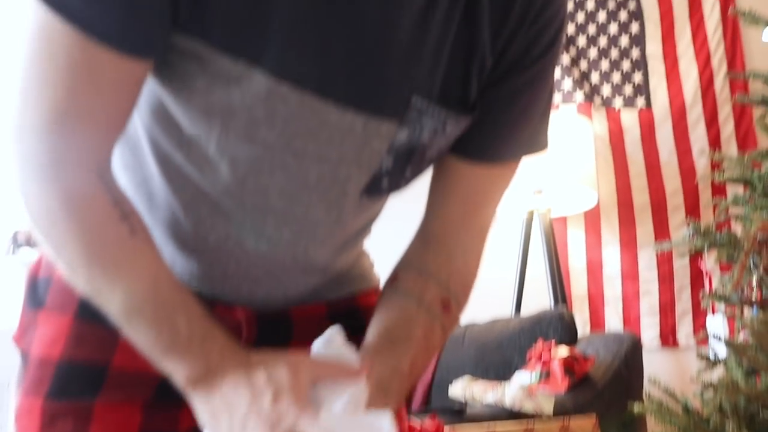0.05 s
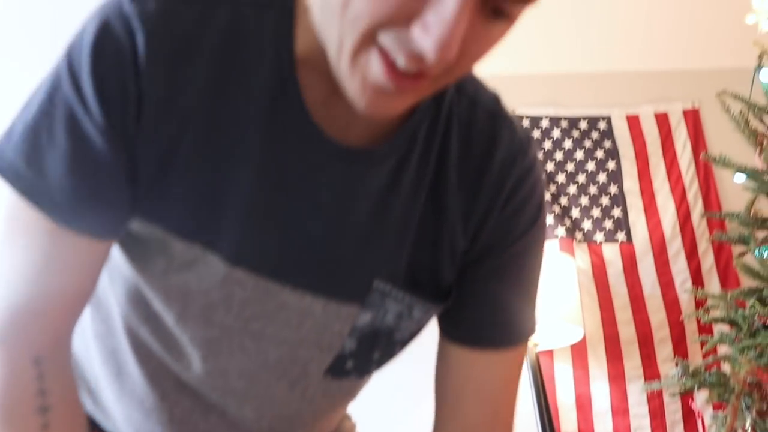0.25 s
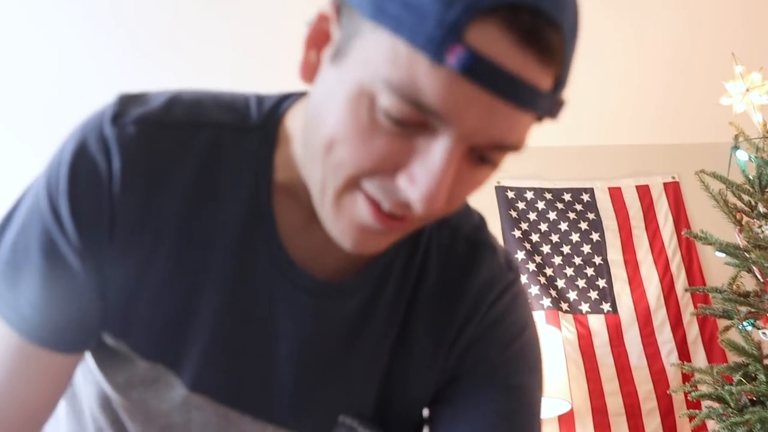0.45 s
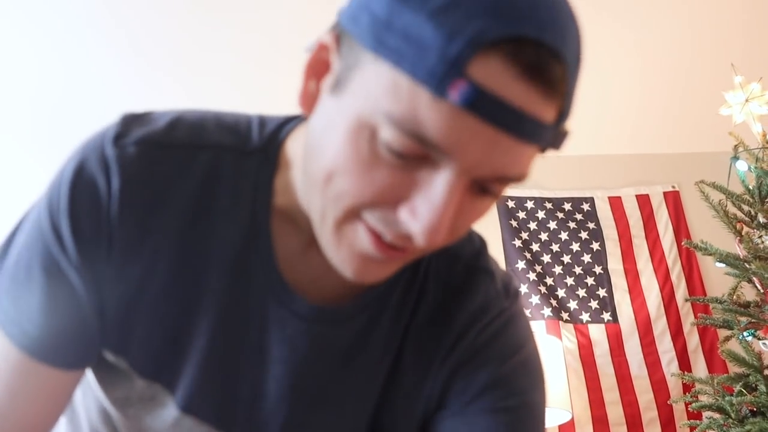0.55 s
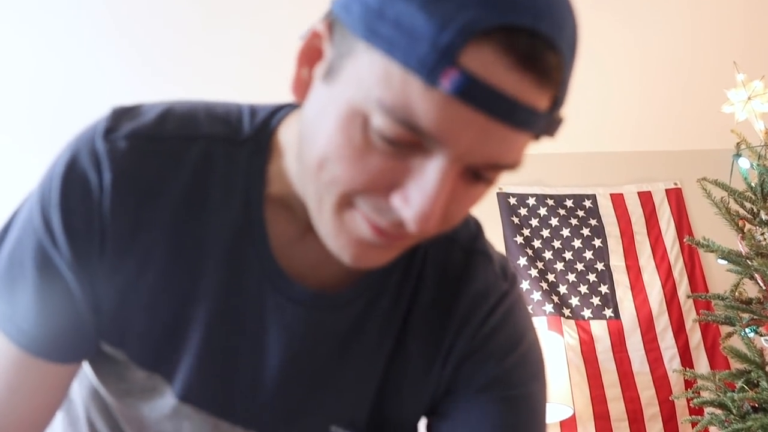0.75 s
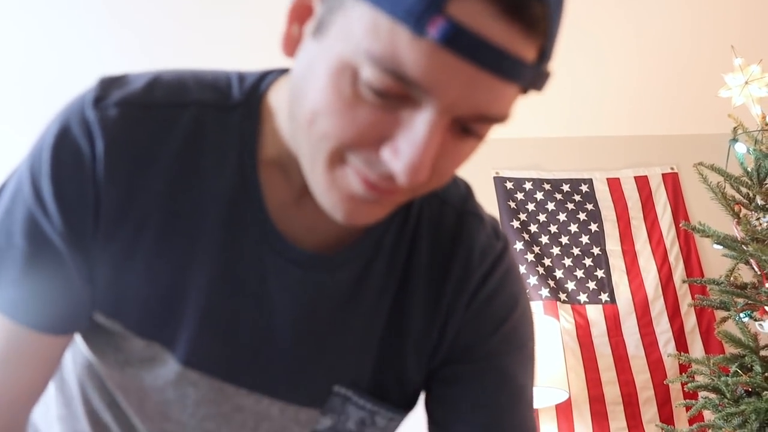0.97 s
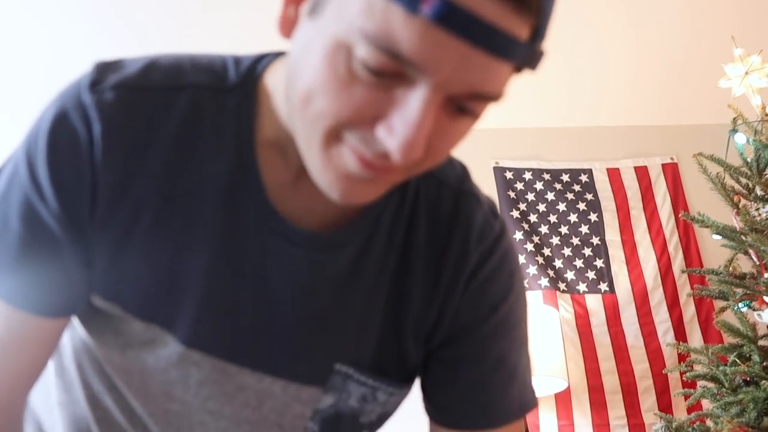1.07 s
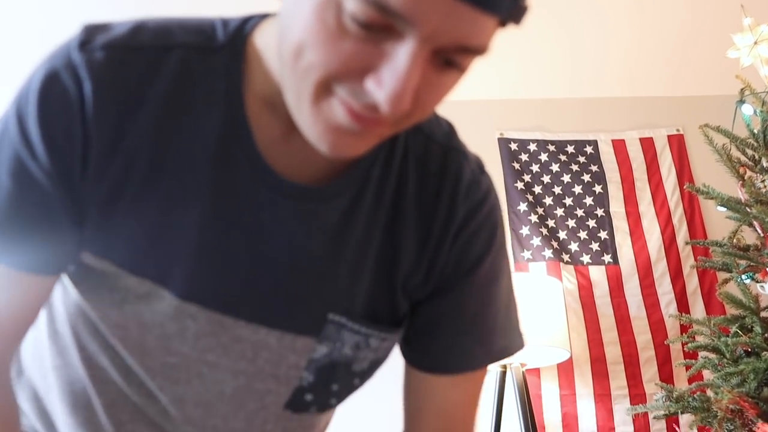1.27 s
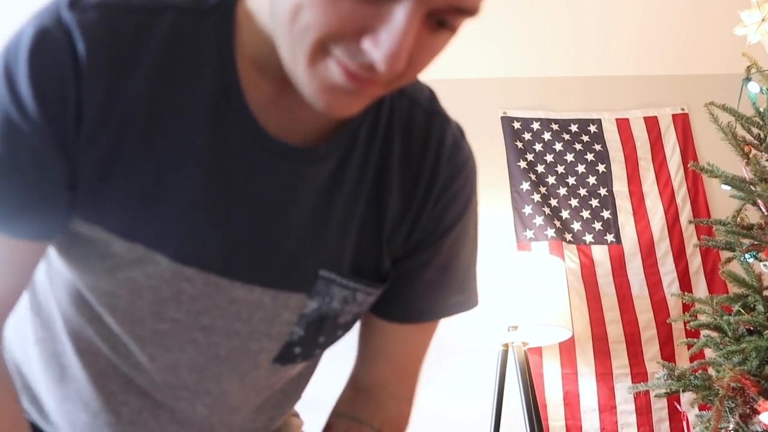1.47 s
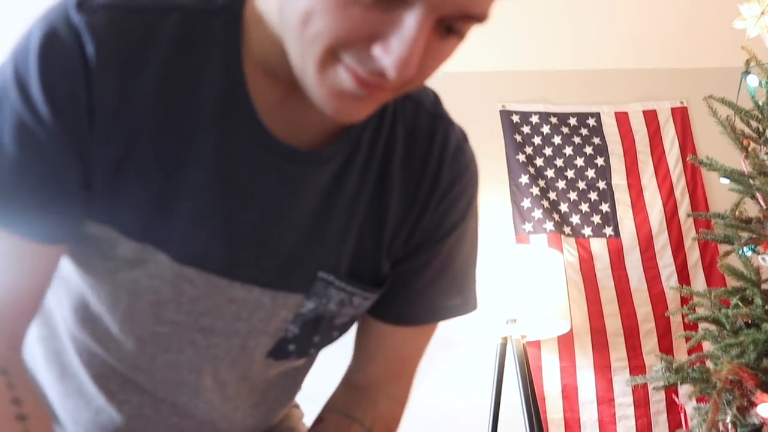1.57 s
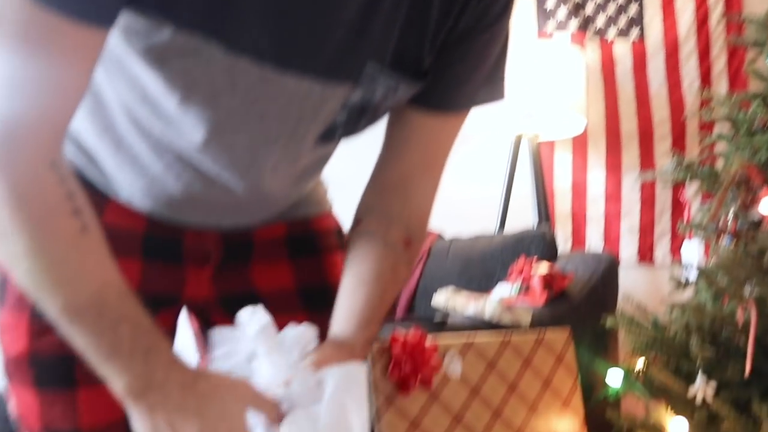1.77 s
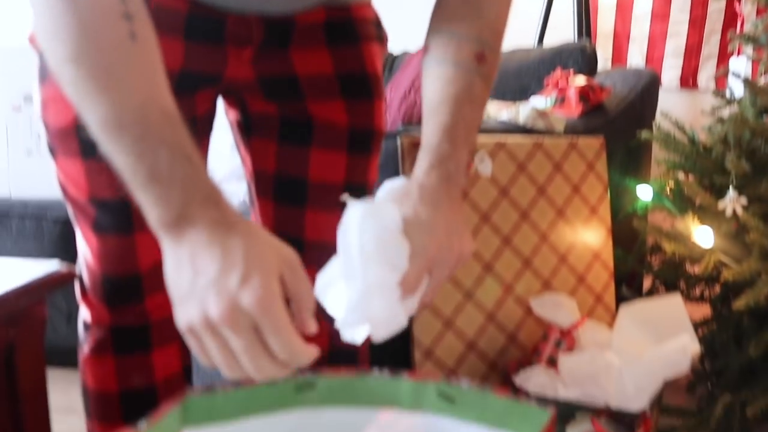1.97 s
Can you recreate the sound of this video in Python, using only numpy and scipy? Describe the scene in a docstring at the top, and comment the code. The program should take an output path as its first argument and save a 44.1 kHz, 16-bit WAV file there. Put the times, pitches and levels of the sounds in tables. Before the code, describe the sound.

Crisp thin paper crinkles close to the microphone, pauses around half a second, resumes with separate sharp snaps, then rustles hard until the end, over faint deep rumble and quiet room tone in a small room.

```python
"""A dense, dry crackle of tissue paper, scrunched in the hands, then rummaged in a gift bag and pulled out.
Streams of tiny random snaps ring the facets of the sheet, over filtered noise for the hiss of sliding sheets.
Stiff folds ping, fine creases tick, larger creases snap alone as decaying tones; filtered noise is the bag.
A small living room adds a short noise tail. A deep, wavering sine rumbles beneath, with soft room tone,
and swells as the paper comes out."""
import sys
import numpy as np
from scipy import signal
from scipy.fft import rfft, irfft
from scipy.io import wavfile
from scipy.ndimage import uniform_filter1d

SR = 44100
rng = np.random.default_rng(int(sys.argv[2]) if len(sys.argv) > 2 else 0)


def persist_wave(psi):
    """Save psi, clipped to +-1, as 16-bit WAV."""
    counts = np.round(np.clip(psi, -1, 1) * 32767).astype(np.int16)
    wavfile.write(sys.argv[1], SR, np.atleast_2d(counts).T)


N = 89126  # length [samples]

# Rustle loudness in three bands, before the trims below; the middle lies around 4 kHz:
# (time [s], middle level [dB], body level [dB], treble level [dB])
RUSTLE_LEVELS = [(0.0,-19,-26.5,-24), (0.02,-20,-27.5,-19.5), (0.08,-28,-32.5,-31.5), (0.107,-25,-33,-29),
                 (0.12,-18.5,-22.5,-19), (0.14,-17,-25,-21.5), (0.17,-25.5,-32,-30.5), (0.2,-23,-30,-27),
                 (0.26,-24.5,-34.5,-36), (0.29,-21.5,-34.5,-36), (0.355,-24.5,-36.5,-38),
                 (0.40,-27.5,-40.5,-40), (0.44,-36.5,-47,-54), (0.50,-44,-53.5,-62), (0.57,-50.5,-52.5,-62),
                 (0.595,-37.5,-47.5,-54.5), (0.615,-27.5,-39,-45), (0.65,-26,-36,-38.5),
                 (0.74,-34,-41.5,-45.5), (0.81,-31,-40.5,-48.5), (0.825,-28,-38.5,-43),
                 (0.865,-29.5,-37,-41), (0.9,-30.5,-39,-45), (0.98,-24.5,-32.5,-34.5),
                 (1.015,-26.5,-35,-44.5), (1.07,-29,-35,-40.5), (1.11,-22,-34.5,-36), (1.14,-25.5,-32,-36),
                 (1.17,-26,-38.5,-45), (1.19,-15,-29,-30.5), (1.26,-12.5,-24,-27.5), (1.31,-18,-28.5,-31),
                 (1.44,-16,-26.5,-30.5), (1.47,-19.5,-29,-35.5), (1.54,-17.5,-27,-30), (1.6,-22,-31,-30),
                 (1.635,-14.5,-20.5,-27), (1.665,-14,-21.5,-26), (1.7,-21,-30.5,-31.5),
                 (1.78,-17,-26,-27.5), (1.86,-21,-31,-28.5), (1.89,-20,-26.5,-24), (1.935,-20,-30.5,-28.5),
                 (1.955,-22,-28.5,-24.5), (1.985,-28,-36.5,-37.5), (2.02,-30.5,-38,-44)]
# Colour of the paper: (frequency [Hz], relative density [dB per Hz])
PAPER_COLOUR = [(70,-23), (150,-23), (300,-18.5), (410,-12.5), (500,-11), (720,-11), (1000,-10), (1650,-8),
                (2300,-9), (3250,-4.5), (3850,-0.5), (4800,-4.5), (6400,-7), (8600,-11.5), (10200,-13),
                (15500,-25)]
# Larger creases that snap alone: (time [s], level before trim [dB], ring T60 [s])
LONE_CREASES = [(0.049, 1, .003), (0.14, -20, .003), (0.185, -3, 0.0011), (0.514, -31, .008),
                (0.5265, -20, .006), (0.5757, -17, .005), (0.649, -6, 0.0063), (0.739, -6, 0.0037),
                (0.7583, -7, 0.019), (0.7908, -8, 0.007), (0.826, -14, .005), (0.8304, -4, 0.0088),
                (0.9367, -3, 0.012), (0.943, -7.5, 0.02), (0.9625, -4, 0.0088), (1.0826, 1, 0.0059),
                (1.1068, -1, 0.018), (1.137, 4, 0.0029), (1.953, -1, 0.0014), (1.9735, -11, .005)]
# Swells of the deep rumble, before trim: (time [s], level [dB])
RUMBLE_LEVELS = [(0.0,-35), (0.05,-38), (0.09,-55), (0.23,-54), (0.28,-44), (0.75,-45), (0.88,-38),
                 (1.06,-44), (1.23,-37.5), (1.3,-52), (1.43,-33), (1.52,-48), (1.72,-41.5), (1.8,-33),
                 (1.96,-25.5), (2.02,-32.5)]
# Colour of the room tone: (frequency [Hz], relative density [dB per Hz])
AIR_COLOUR = [(20, -6), (60, -6), (130, -14.5), (250, -5), (420, -18.5), (1500, -38), (5000, -11),
              (15000, -47)]
# Hollow colour of the bag's walls: (frequency [Hz], relative density [dB per Hz])
BAG_COLOUR = [(40, -24), (85, -4.5), (125, -3), (170, -4), (240, -0.5), (400, -2), (900, -17), (4000, -58)]

# Crinkle: snap rate at the mean level, and growth of the log rate per dB of level
SNAPS_PER_S, LOG_RATE_PER_DB = 3600, 0.01
SIZE_SPREAD_DB, SIZE_LIMIT_DB = 5, 10
FACET_LOW_HZ, FACET_HIGH_HZ, FACET_Q, FACET_CRACK_DB = 1300, 12900, 4.2, 2.5
# Sliding hiss against the crinkle, and the slight bunching of both
SLIDE_DB, SLIDE_FLUTTER_DB = -1, 2
CLUSTER_DB, CLUSTERS_PER_S = 0.1, 150
# Band edges and level trims of the rustle
BODY_EDGE_HZ, TREBLE_EDGE_HZ = 2965, 6970
BODY_TRIM_DB, MIDDLE_TRIM_DB, TREBLE_TRIM_DB = 2, -2.42, 1.1
# Stiff folds; level is against the middle column of the rustle
FOLDS_PER_S, FOLD_Q, FOLD_SPREAD_DB, FOLD_DB = 390, 23, 3.5, -10.5
FOLD_LOW_HZ, FOLD_HIGH_HZ, FOLD_CENTRE_HZ = 3670, 5450, 4400
# Finest creases; level is against the treble column of the rustle
FINE_PER_S, FINE_HZ, FINE_Q, FINE_SPREAD_DB, FINE_DB = 400, 11100, 1, 9, -5.5
FINE_DECAY_S = 0.00096
RUMBLE_HZ, RUMBLE_WANDER_HZ, RUMBLE_WAVER_DB, RUMBLE_TRIM_DB = 36.6, 3.1, 1.3, 1.5
AIR_DB = -50
# Lone creases: pitch, its scatter as a spread of log frequency, crack against ring, and level trim
CREASE_HZ, CREASE_SCATTER, CREASE_CRACK_DB, CREASE_TRIM_DB = 4010, 0.013, -4, -9
# Bag: level against the body column of the rustle, and when the hands go in
BAG_DB, BAG_FROM_S = -13, 0.57
# Room tail: level against the direct sound, and the gap before it starts
ROOM_T60_S, ROOM_DB, ROOM_DELAY_S = 0.21, -13.5, 0.00286
CEILING, TOP_HZ = 0.85, 15680  # soft peak ceiling [full scale = 1], upper edge of the sound


def undb(db):
    """Turn decibels into gain."""
    return 10 ** (np.asarray(db) / 20)


def unit(x):
    """Scale to rms 1."""
    return x / np.sqrt(np.mean(x ** 2) + 1e-18)


def curve(table, axis=1):
    """Draw one column of a table as straight lines over time."""
    rows = np.array(table)
    return np.interp(np.arange(N) / SR, rows[:, 0], rows[:, axis])


def walk(rate):
    """Drift smoothly between random values, `rate` of them a second, with rms 1."""
    hold = max(int(SR / rate), 2)
    steps = np.repeat(rng.standard_normal(N // hold + 1), hold)
    return unit(uniform_filter1d(steps, hold)[:N])


def colour(x, points):
    """Shape a spectrum through (Hz, dB) points with a causal, minimum-phase filter."""
    hz, db = np.array(points).T
    size = 4096
    bins_hz = np.arange(size // 2 + 1) * SR / size
    log_gain = np.log(undb(np.interp(np.log(bins_hz + 1), np.log(hz), db)))
    # Folding the cepstrum forward in time makes the response minimum-phase
    cepstrum = irfft(log_gain)[:size // 2]
    cepstrum[1:] *= 2
    response = irfft(np.exp(rfft(cepstrum, size)))
    return signal.fftconvolve(x, response)[:N]


def below(x, hz, order=4):
    """Low-pass without delay, so that bands split by subtraction."""
    return signal.sosfiltfilt(signal.butter(order, hz, fs=SR, output="sos"), x)


def ring(x, hz, q):
    """Excite one resonance, gain 1 at its centre."""
    return signal.lfilter(*signal.iirpeak(hz, q, fs=SR), x)


def sparse(rate, spread_db):
    """Scatter random impulses of varied size and either sign."""
    size = undb(spread_db * np.clip(rng.standard_normal(N), -2, 1.3))
    return (rng.random(N) < rate / SR) * size * rng.choice([-1, 1], N)


def crinkle(rate, count=14):
    """Creases buckle at random, most small, a few large; each cracks and briefly rings one facet of the sheet."""
    out = 0
    for hz in np.geomspace(FACET_LOW_HZ, FACET_HIGH_HZ, count):
        size = undb(np.minimum(SIZE_SPREAD_DB * rng.exponential(size=N), SIZE_LIMIT_DB))
        snaps = (rng.random(N) < rate / count / SR) * size * rng.choice([-1, 1], N)
        out = out + undb(FACET_CRACK_DB) * snaps + 2 * ring(snaps, hz, FACET_Q)
    # Even out loudness, so that rate sets density only
    return unit(out / np.sqrt(rate))


def slide():
    """Sheets rub past each other: a fluttering noise hiss."""
    flutter = undb(SLIDE_FLUTTER_DB * walk(160))
    return undb(SLIDE_DB) * unit(rng.standard_normal(N) * flutter)


def rustle():
    """Harder handling gives more snaps over the sliding hiss; body, middle and treble each follow a level."""
    middle_db, body_db, treble_db = (curve(RUSTLE_LEVELS, axis) for axis in (1, 2, 3))
    rate = SNAPS_PER_S * np.exp(LOG_RATE_PER_DB * (middle_db - middle_db.mean()))
    # Creases give way in small runs
    clusters = undb(CLUSTER_DB * walk(CLUSTERS_PER_S))
    paper = colour((crinkle(rate) + slide()) * clusters, PAPER_COLOUR)
    body = below(paper, BODY_EDGE_HZ)
    body_and_middle = below(paper, TREBLE_EDGE_HZ)
    middle = body_and_middle - body
    treble = paper - body_and_middle
    return (unit(body) * undb(body_db + BODY_TRIM_DB)
            + unit(middle) * undb(middle_db + MIDDLE_TRIM_DB)
            + unit(treble) * undb(treble_db + TREBLE_TRIM_DB))


def folds(count=7):
    """Stiff folds flip over and ping briefly at narrow resonances, more often under harder handling."""
    middle_db = curve(RUSTLE_LEVELS, axis=1)
    rate = FOLDS_PER_S * np.exp(2 * LOG_RATE_PER_DB * (middle_db - middle_db.mean()))
    pings = 0
    for hz in np.geomspace(FOLD_LOW_HZ, FOLD_HIGH_HZ, count):
        pings = pings + ring(sparse(rate / count, FOLD_SPREAD_DB), hz, FOLD_Q)
    pings = ring(pings, FOLD_CENTRE_HZ, 2.4) / np.sqrt(rate)
    return unit(pings) * undb(middle_db + FOLD_DB)


def fine_snaps():
    """The finest creases tick sparsely: very short, decaying bursts of bright noise."""
    impulses = np.abs(sparse(FINE_PER_S, FINE_SPREAD_DB))
    bursts = signal.lfilter([1], [1, -np.exp(-1 / (FINE_DECAY_S * SR))], impulses)
    ticks = bursts * rng.standard_normal(N)
    for _ in range(2):
        ticks = ring(ticks, FINE_HZ, FINE_Q)
    return unit(ticks) * undb(curve(RUSTLE_LEVELS, axis=3) + FINE_DB)


def rumble():
    """A deep sine whose pitch and level waver at random."""
    hz = RUMBLE_HZ + RUMBLE_WANDER_HZ * walk(26)
    phase = 2 * np.pi * np.cumsum(hz) / SR
    return np.sin(phase) * undb(curve(RUMBLE_LEVELS) + RUMBLE_TRIM_DB + RUMBLE_WAVER_DB * walk(15))


def room_tone():
    """Steady, coloured noise of the quiet room."""
    return undb(AIR_DB) * unit(colour(rng.standard_normal(N), AIR_COLOUR))


def creases():
    """Single larger creases: a short noise crack and an exponentially decaying ring."""
    out = np.zeros(2 * N)
    t = np.arange(SR // 20) / SR
    for start, db, t60 in LONE_CREASES:
        hz = CREASE_HZ * np.exp(CREASE_SCATTER * rng.standard_normal())
        tone = np.sin(2 * np.pi * hz * t) * np.exp(-np.log(1000) * t / t60)
        crack = ring(rng.standard_normal(len(t)), 7000, 1.8) * np.exp(-t / 0.00017)
        i = int(start * SR)
        out[i:i + len(t)] += undb(db + CREASE_TRIM_DB) * (tone + undb(CREASE_CRACK_DB) * crack)
    return out[:N]


def bag():
    """The bag's walls flap under the paper once the hands are inside: hollow, fluctuating noise."""
    inside = np.clip((np.arange(N) / SR - BAG_FROM_S) / 0.12, 0, 1)  # fades in over 0.12 s
    flaps = rng.standard_normal(N) * undb(2 * walk(70))
    return unit(colour(flaps, BAG_COLOUR)) * inside * undb(curve(RUSTLE_LEVELS, axis=2) + BAG_DB)


def room(x):
    """Add the short, diffuse tail of a furnished room as decaying noise."""
    t = np.arange(SR // 2) / SR
    decay = np.exp(-np.log(1000) * t / ROOM_T60_S)
    tail = rng.standard_normal(len(t)) * decay * (t > ROOM_DELAY_S)
    wet = signal.fftconvolve(x, tail / np.linalg.norm(tail))[:N]
    return (x + undb(ROOM_DB) * wet) / np.hypot(1, undb(ROOM_DB))


def scene():
    """Paper and bag sound in the room, over rumble and room tone."""
    handling = rustle() + folds() + fine_snaps() + creases() + bag()
    return (room(handling) + rumble() + room_tone())[None]


def record(dry):
    """Round the highest peaks softly, then cut the top steeply."""
    rounded = dry / (1 + (dry / CEILING) ** 4) ** 0.25
    top_cut = signal.ellip(12, 0.1, 90, TOP_HZ, fs=SR, output="sos")
    return signal.sosfilt(top_cut, rounded)


dry = scene()
out = record(dry)
persist_wave(out)
```